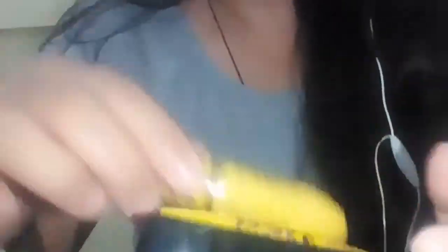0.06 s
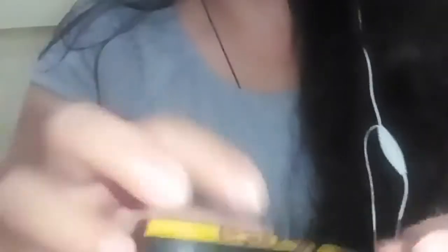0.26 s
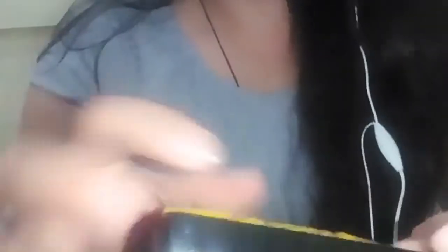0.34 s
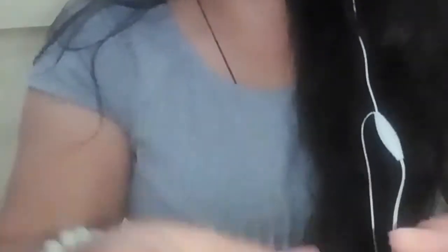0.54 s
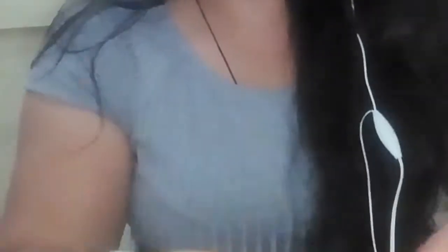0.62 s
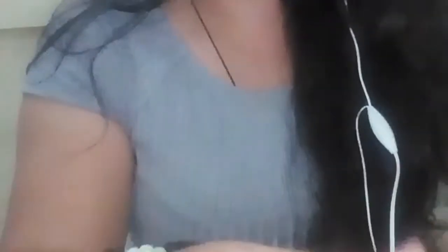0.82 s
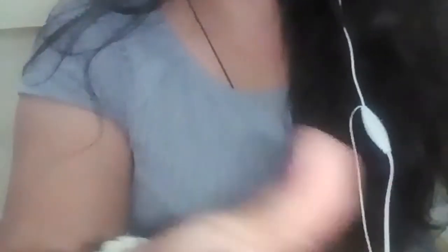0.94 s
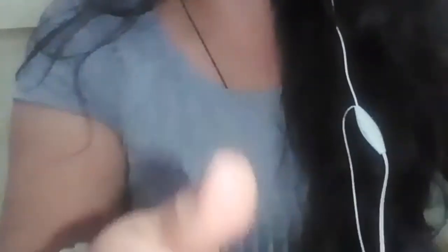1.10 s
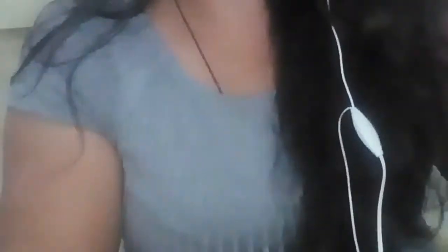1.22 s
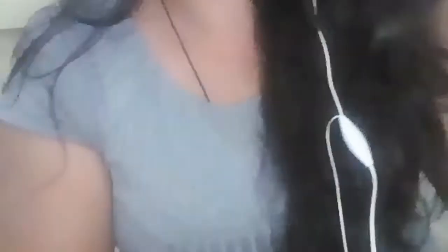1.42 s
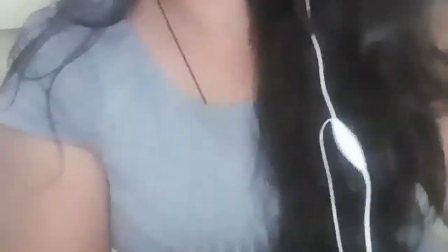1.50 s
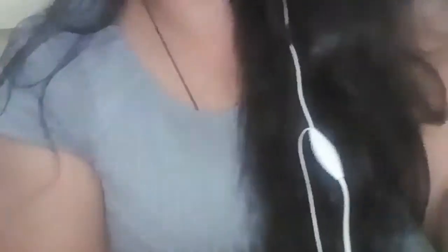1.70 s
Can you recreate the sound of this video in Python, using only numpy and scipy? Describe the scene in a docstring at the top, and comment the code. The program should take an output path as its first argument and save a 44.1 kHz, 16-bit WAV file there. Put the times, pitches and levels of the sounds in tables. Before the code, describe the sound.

Plastic makeup tubes clack and rattle in a hollow plastic case, close up in a room

```python
"""Plastic tubes in a hollow case

Plastic tubes are dropped into and shuffled in a hollow plastic case near a small microphone.
Each knock is a flurry of quick contacts that excites decaying modes of the case and the tube.
Low thuds and hollow body tones lie under the knocks; fingers rustle as filtered random slips.
The room answers after a short gap, as decaying noise convolved with the sources.
Faint mains hum (sine tones) and room noise (filtered noise) lie underneath."""
import sys
import numpy as np
from scipy import signal
from scipy.fft import rfft, irfft
from scipy.io import wavfile
from scipy.ndimage import uniform_filter1d

SR = 44100
rng = np.random.default_rng(int(sys.argv[2]) if len(sys.argv) > 2 else 0)


def store_wav(level_fs):
    """Save 16-bit WAV to argv[1]."""
    pcm = np.round(np.clip(np.atleast_2d(level_fs), -1, 1) * 32767)
    wavfile.write(sys.argv[1], SR, pcm.T.astype(np.int16))


def level_to_linear(level):
    """Convert decibel levels to linear amplitude factors, elementwise."""
    exponent = np.asarray(level, float) / 20
    return 10 ** exponent


N = 77175  # length in samples

# Tones of the mains hum. Each row: frequency in Hz, rms level in dB.
HUM_TONES = [(50, -63.5), (100, -73)]
# Spectrum of the room noise. Each row: frequency in Hz, relative density in dB per Hz.
AIR_SPECTRUM = [(40, 3), (75, 2.5), (120, 6), (250, 1.5), (500, -4.5), (1000, -1), (1600, -13), (3600, -15),
                (6000, -20), (14000, -28.5), (16500, -47)]
# Decay of the room. Each row: frequency in Hz, T60 in seconds.
ROOM_DECAY = [(200, 0.088), (530, 0.28), (1390, 0.18), (3680, 0.38), (9700, 0.29), (15000, 0.21)]
# Spectrum of the reflections before decay. Each row: frequency in Hz, relative level in dB.
ROOM_SPECTRUM = [(200, -0.5), (800, 1.5), (1500, -0.5), (4000, -8.5), (12000, -3)]
# Rubbing of the fingers over time. Each row: time in seconds, level in dB.
RUB_LEVEL = [(0, -42), (.03, -50.5), (.07, -44), (0.101, -55), (.125, -100), (.22, -90), (0.263, -34.5),
             (.3, -84), (0.359, -44.5), (0.419, -66.5), (.63, -63), (.67, -44), (.73, -44), (0.799, -44),
             (.88, -89), (.93, -57), (1.0, -50.5), (1.09, -42.5), (1.25, -71.5), (1.427, -69.5),
             (1.466, -46), (1.529, -60.5), (1.678, -68), (1.73, -52)]
# Spectrum of the rubbing. Each row: frequency in Hz, relative density in dB per Hz.
RUB_SPECTRUM = [(150, -42), (300, -6), (600, -11.5), (1000, 0), (1400, 4), (1900, -5), (2600, -12),
                (4500, -17.5), (7000, -33), (16000, -36)]
# Low thuds and hollow body tones under the knocks. Each row: start in seconds, level in dB before the
# soft onset and low cut, frequency in Hz.
THUDS = [(0.23, -16, 255), (0.248, -14, 178), (0.259, -21.5, 170), (0.273, -22.5, 190), (0.29, -21, 163),
         (0.336, -22, 185), (0.464, -21.5, 607), (0.65, -23.5, 462), (0.821, -18, 606), (0.858, -11.5, 467),
         (0.862, -13, 257), (1.444, -31, 665), (1.715, -30, 275)]
# Modes of the case. Each row: frequency in Hz before detuning, relative energy in dB before focus and
# random spread, T60 in seconds.
CASE_MODES = [(564, 5, 0.037), (707, 9, 0.08), (776, 5.5, 0.11), (1060, 23, 0.014), (1262, 19, 0.041),
              (1359, 23, 0.011), (1640, 25.5, 0.0082)]
# Modes of the tube. Each row: frequency in Hz before detuning, relative energy in dB before focus, tilt
# and random spread, T60 in seconds.
TUBE_MODES = [(1864, 10.5, 0.0014), (2706, 9, 0.0027), (3300, 4, 0.01), (3910, 3.5, 0.0045),
              (4700, 9.5, 0.0026), (5370, 2, 0.0038), (6170, 10, 0.0052), (8270, 14.5, 0.0018),
              (9820, 10, 0.0042), (13800, -9, .0015)]
# Knocks of tube on case. Each row: start in seconds, peak of the short-time level in dB, centre of the
# case's ring in Hz, crack of the tube relative to the ring in dB before CRACK_DB, contact time scale
# in ms, centre of the crack in Hz, gain of the share sent to the room in dB.
TUBE_KNOCKS = [(0.2432, -24, 1290, -18.5, 7.3, 2800, 5), (0.253, -33, 1350, -9, 5.7, 3700, 7),
               (.271, -30.5, 1160, -11.5, 3.6, 3120, -2.5), (0.3176, -21, 1270, -15.5, 5.8, 3560, 0.5),
               (0.333, -33, 1020, 11, 4.6, 2940, 9), (0.343, -34, 970, -2, 2.1, 3040, -2),
               (.412, -21.5, 1270, -19.5, 1.76, 4700, -0.5), (0.4647, -16.5, 1270, -14.5, 2.17, 4550, 1),
               (.480, -25, 1060, -15, 2.18, 3300, -16), (0.534, -40.5, 1280, -9, 5.8, 5000, 1),
               (0.5388, -38, 1160, -4, 3, 3000, 3), (0.5736, -29.5, 1160, -12, 3.15, 4700, 4),
               (0.595, -34, 1190, -4.5, 4.9, 4700, -10), (.638, -37, 1440, -9, 8.7, 2460, 8),
               (.648, -28.5, 790, -19.5, 3.84, 3320, 0), (0.653, -26, 1350, -15, 5.1, 2620, 2),
               (.663, -24, 1240, -31, 4.8, 2860, -4), (0.689, -19, 1240, -25, 6.2, 3150, 1),
               (0.6941, -17, 1620, -7.5, 3.4, 3270, -2.5), (.779, -29, 940, -24, 1.45, 2380, -2.5),
               (0.809, -36, 680, -1, 1.95, 3020, 23.5), (0.822, -10.5, 1490, -14, 4.6, 2610, 0.5),
               (.858, -9, 1050, -2, 3.09, 4370, -2.5), (0.8926, -19, 1000, 5, 1.34, 4700, 3.5),
               (.953, -40, 657, -13, 9.1, 3050, 5), (.9942, -32, 545, -22, 2.4, 2497, -5),
               (1.010, -28.5, 674, -19, 2.1, 3130, -9), (1.0298, -32.5, 980, -13, 2.4, 2700, 10),
               (1.0473, -21, 1260, -9, 4, 2340, 2.5), (1.056, -25, 1290, 14, 0.63, 2340, 1.5),
               (1.069, -12, 1053, -9.5, 5.55, 3300, 0.5), (1.253, -42.5, 770, -24, 3.8, 3650, -2.5),
               (1.278, -50.5, 1020, -10, 2.3, 3500, 14), (1.343, -49.5, 940, -12, 7.4, 9000, -5),
               (1.4431, -32, 1530, -0.5, 4.85, 3600, 6), (1.569, -50, 790, -16, 8.8, 3600, 0.5),
               (1.588, -47.5, 1380, 23, 3.2, 3300, 11.5), (1.698, -35, 1057, -16, 10.6, 4100, 5),
               (1.718, -38.5, 1060, -5, 1.14, 2410, 1)]

AIR_DB = -61  # rms
ROOM_DB, GAP_S, BUILD_S = -11.5, 0.0067, 0.0057
GRAINS_PER_S, GRAIN_SPREAD_DB = 3500, 2.5
THUD_T60_S, THUD_RISE_S = 0.022, 0.0025
THUD_CUT_HZ = 155  # low cut of the thuds
SPREAD_DB, DETUNE_SHARE = 3, 0.06  # full ranges of a mode's random level and pitch
SOFT_CYCLES = 0.15  # time constant of a mode's swing up, in its own cycles
FOCUS_DB_PER_OCT = 42  # modes far from a knock's centre ring less
CRACK_FOCUS_DB_PER_OCT, CRACK_FOCUS_MAX_DB = 15.5, 13
TILT_DB_PER_OCT_PER_DB = 0.65  # harder knocks are brighter: tilt per dB of peak
CRACK_DB = 10  # added to every crack
CONTACTS_PER_MS, RISE_SHARE = 11, 0.5  # the rise is a share of the contact time scale
BLOW_DB = 2.5  # the main blow, relative to the largest small contact
LOW_CUT_SHARE = 0.28  # little radiates below this share of a knock's centre
SMEAR_PER_KHZ = 0.025  # half-width of the spectral averaging, as a share of frequency, per kHz


def evened(x):
    """Normalization by signal power: scales to rms 1."""
    return x / np.sqrt(np.mean(x ** 2) + 1e-20)


def read(points, hz):
    """Linear interpolation of a table on a logarithmic frequency axis."""
    table_hz, value = np.transpose(points)
    return np.interp(np.log(hz + 1), np.log(table_hz + 1), value)


def add(mix, s, sound):
    """Superposition: sounds sum linearly, here from time s in seconds."""
    part = mix[round(s * SR):][:len(sound)]
    part += sound[:len(part)]


def coloured(x, points):
    """Linear filtering: the spectrum of x is multiplied by the gains of a table."""
    hz = np.fft.rfftfreq(len(x), 1 / SR)
    return irfft(rfft(x) * level_to_linear(read(points, hz)), len(x))


def mode(t, hz, t60):
    """Damped free vibration: a sinusoid whose amplitude decays exponentially."""
    return level_to_linear(-60 * t / t60) * np.sin(2 * np.pi * hz * t)


def mains_hum():
    """Steady periodic hum: sine tones at the mains frequency and its second harmonic."""
    t = np.arange(N) / SR
    return sum(level_to_linear(db) * np.sqrt(2) * np.sin(2 * np.pi * (hz * t + rng.random()))
               for hz, db in HUM_TONES)


def room_noise():
    """Stationary random noise: white noise shaped to the spectrum of the room."""
    return level_to_linear(AIR_DB) * evened(coloured(rng.standard_normal(N), AIR_SPECTRUM))


def reflections():
    """Diffuse reverberation: noise that builds up after a gap, each band decaying at its own rate."""
    hz, t, noise = signal.stft(rng.standard_normal(SR // 2), SR, nperseg=256)
    band_db = read(ROOM_SPECTRUM, hz)[:, None] - 60 * t / read(ROOM_DECAY, hz)[:, None]
    tail = signal.istft(noise * level_to_linear(band_db), SR, nperseg=256)[1]
    tail = tail * np.clip((np.arange(len(tail)) / SR - GAP_S) / BUILD_S, 0, 1)
    return tail / np.linalg.norm(tail)


def room(x):
    """Response by convolution: three reflection patterns take turns every 100 samples, crossfaded."""
    out = np.zeros(N)
    turn = (np.arange(N) // 100) % 3
    for k in range(3):
        # square root: the shares add up in power
        share = np.sqrt(np.clip(uniform_filter1d(1. * (turn == k), size=70), 0, 1))
        out += signal.fftconvolve(x * share, reflections())[:N]
    return level_to_linear(ROOM_DB) * out


def rubbing():
    """Stick-slip friction: many tiny slips of uneven size sound through the plastic."""
    size = level_to_linear(GRAIN_SPREAD_DB * np.minimum(rng.exponential(1, N), 5))
    slips = size * (rng.random(N) < GRAINS_PER_S / SR) * rng.choice([-1., 1.], N)
    s, db = np.transpose(RUB_LEVEL)
    level = level_to_linear(np.interp(np.arange(N) / SR, s, db))
    return level * evened(coloured(slips, RUB_SPECTRUM))


def thud(level_db, hz):
    """Damped resonance with a gradual onset: a soft thud or hollow body tone, with a low cut."""
    t = np.arange(6000) / SR
    tone = level_to_linear(level_db) * (1 - np.exp(-t / THUD_RISE_S)) * mode(t, hz, THUD_T60_S)
    return signal.lfilter(*signal.butter(2, THUD_CUT_HZ, "high", fs=SR), tone)


def struck(modes, contacts, luck):
    """Modal superposition: contacts ring a body, a little different at each spot that is hit."""
    t, out = np.arange(1500) / SR, 0
    for k, (hz, db, t60) in enumerate(modes):
        detuned_hz = hz * (1 + DETUNE_SHARE * (luck[20 + k] - 0.5))
        swing = (1 - np.exp(-t * hz / SOFT_CYCLES)) * mode(t, detuned_hz, t60)
        ring = signal.fftconvolve(contacts, swing)
        out = out + level_to_linear(db + SPREAD_DB * luck[k]) * ring / np.linalg.norm(ring)
    return out / np.linalg.norm(out)


def contact_flurry(contact_ms, luck):
    """Repeated micro-impacts: random contacts swell and fade around one main blow."""
    contact_ms = max(contact_ms, 0.3)
    u = np.arange(600) * 1000 / SR / contact_ms  # time in contact time scales
    swell = np.minimum(u / RISE_SHARE, 1) ** 2 * np.exp(-2 * np.maximum(u - RISE_SHARE, 0))
    hits = luck[:600] < CONTACTS_PER_MS * 1000 / SR
    # a faint floor keeps some motion between hits
    contacts = swell * (0.0005 + hits) * (2 * luck[600:1200] - 1)
    contacts[round(RISE_SHARE * contact_ms * SR / 2000)] += level_to_linear(BLOW_DB)  # halfway up the rise
    return contacts


def knock(peak_db, centre_hz, crack_db, contact_ms, crack_hz, luck):
    """Impact excitation: one flurry of contacts rings the hollow case and cracks the tube."""
    contacts = contact_flurry(contact_ms, luck)
    case = [(hz, db - FOCUS_DB_PER_OCT * abs(np.log2(hz / centre_hz)), t60)
            for hz, db, t60 in CASE_MODES]
    tube = []
    for hz, db, t60 in TUBE_MODES:
        octaves = np.log2(hz / crack_hz)
        focus = min(CRACK_FOCUS_DB_PER_OCT * abs(octaves), CRACK_FOCUS_MAX_DB)
        tube.append((hz, db - focus + TILT_DB_PER_OCT_PER_DB * peak_db * octaves, t60))
    ring = struck(case, contacts, luck[1200:])
    crack = level_to_linear(crack_db + CRACK_DB) * struck(tube, contacts, luck[1240:])
    low_cut = signal.butter(2, LOW_CUT_SHARE * centre_hz, "high", fs=SR, output="sos")
    both = signal.sosfilt(low_cut, ring + crack)
    loudest_power = uniform_filter1d(both ** 2, size=88).max()  # over 2 ms
    return level_to_linear(peak_db) * both / np.sqrt(2 * loudest_power)


def all_round(sound):
    """Directional averaging: summed over all directions, the treble peaks of a knock even out."""
    spectrum, k = rfft(sound, 4096), np.arange(2049)
    total = np.cumsum(abs(spectrum) ** 2)
    half = 0.5 + SMEAR_PER_KHZ * k * k * SR / 4096000  # half-width in bins
    lo, hi = np.maximum(k - half, 0), np.minimum(k + half, k[-1])
    even_power = (np.interp(hi, k, total) - np.interp(lo, k, total)) / (hi - lo)
    phase = spectrum / (abs(spectrum) + 1e-12)
    return irfft(phase * np.sqrt(even_power))[:len(sound)]


def scene():
    """Direct and reverberant fields: all sources, dry and through the room, over the background."""
    background = mains_hum() + room_noise()
    dry = rubbing()
    for s, *row in THUDS:
        add(dry, s, thud(*row))
    sent = dry.copy()
    lucks = rng.random((len(TUBE_KNOCKS), 1280))
    for (s, *row, room_db), luck in zip(TUBE_KNOCKS, lucks):
        sound = knock(*row, luck)
        add(dry, s, sound)
        add(sent, s, level_to_linear(room_db) * all_round(sound))
    return (dry + room(sent) + background)[None]


def band_limit(x):
    """A steep low-pass at the top of the band."""
    return signal.sosfilt(signal.butter(12, 16840, fs=SR, output="sos"), x)


def record(dry):
    """Single-channel pickup: the finished mix is taken as one signal."""
    return band_limit(dry)


dry = scene()
out = record(dry)
store_wav(out)
```